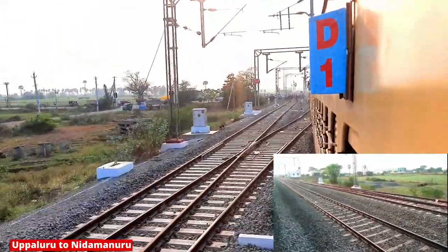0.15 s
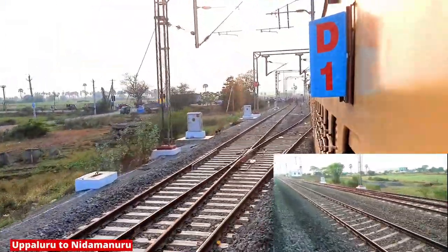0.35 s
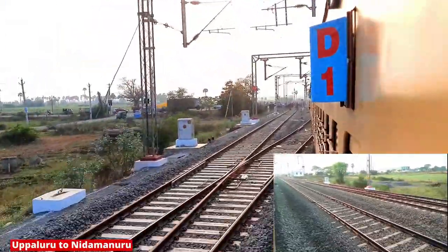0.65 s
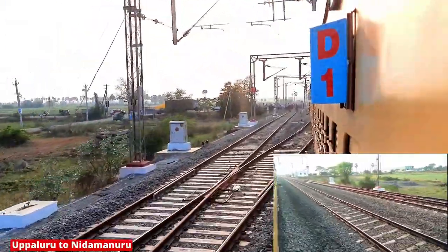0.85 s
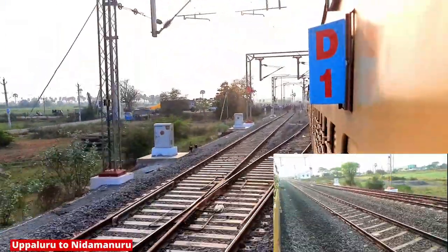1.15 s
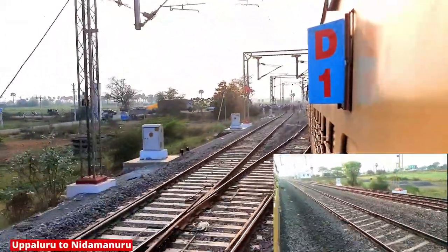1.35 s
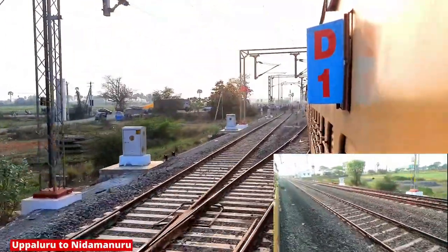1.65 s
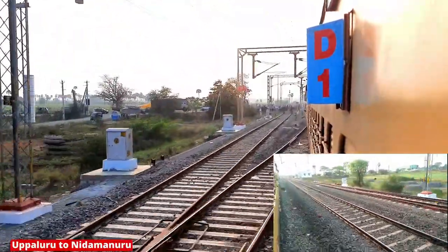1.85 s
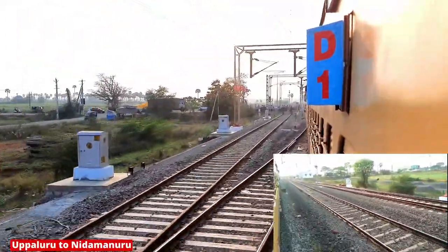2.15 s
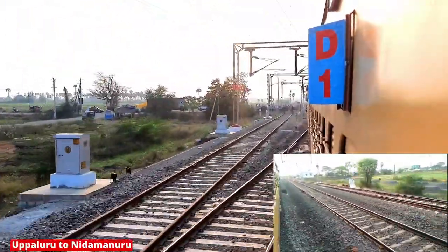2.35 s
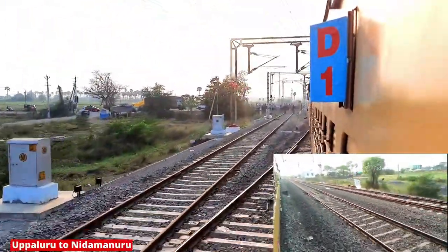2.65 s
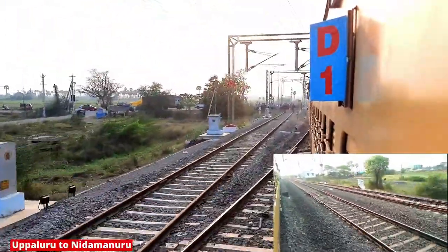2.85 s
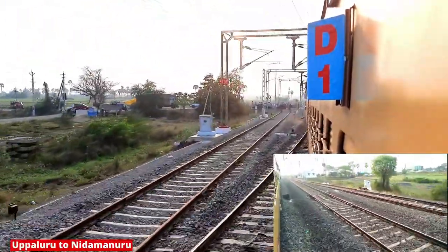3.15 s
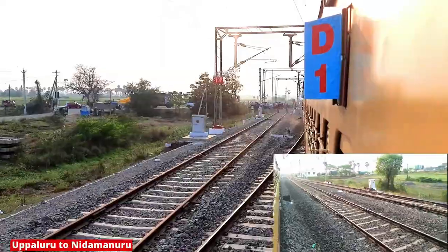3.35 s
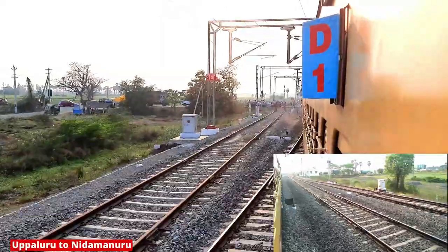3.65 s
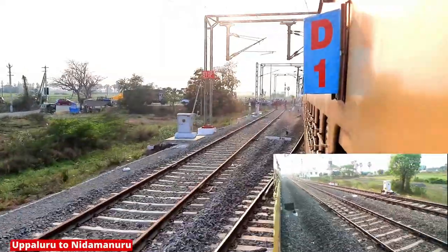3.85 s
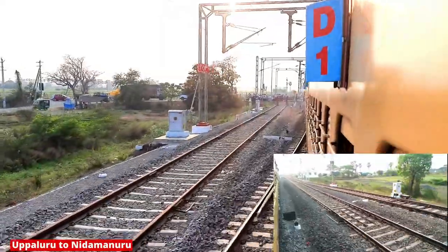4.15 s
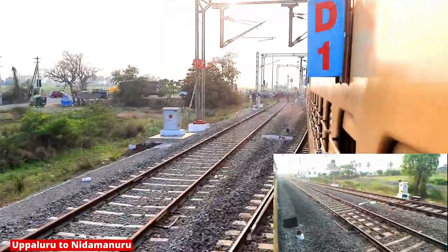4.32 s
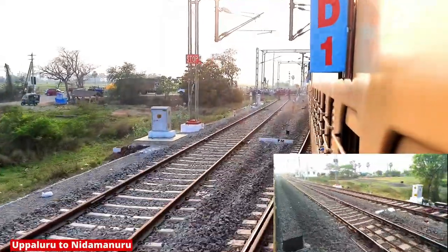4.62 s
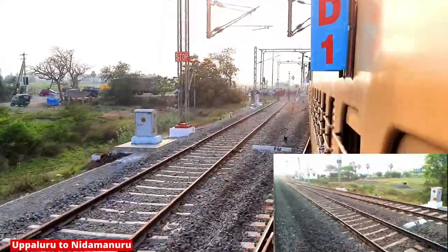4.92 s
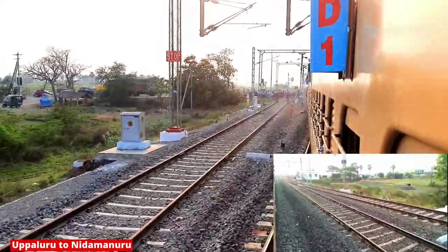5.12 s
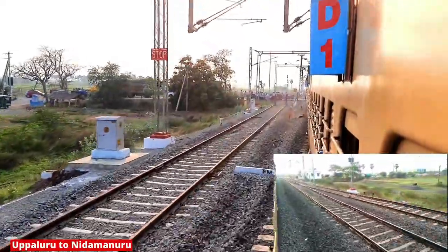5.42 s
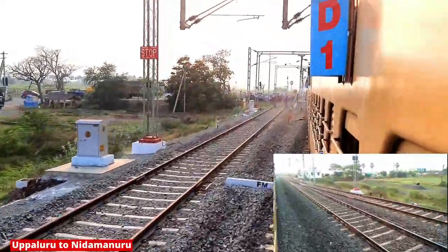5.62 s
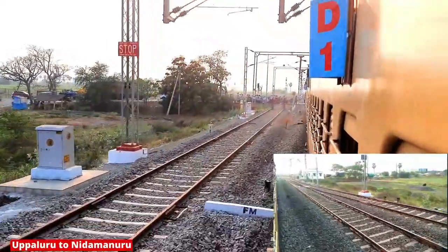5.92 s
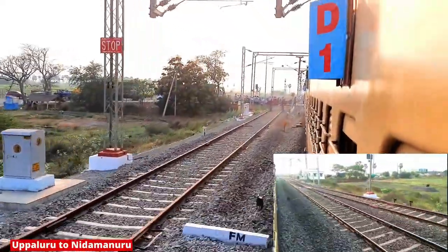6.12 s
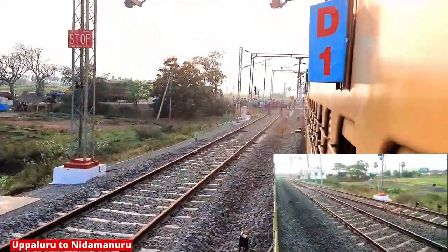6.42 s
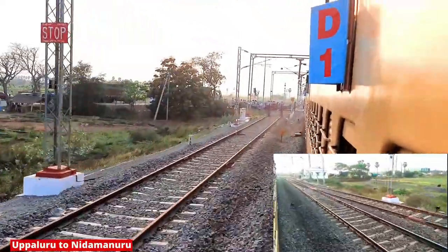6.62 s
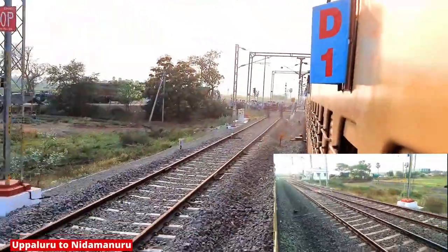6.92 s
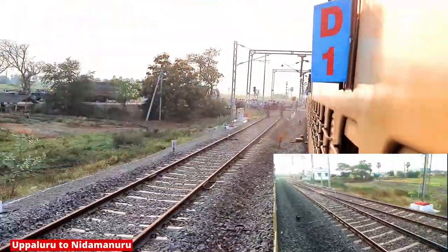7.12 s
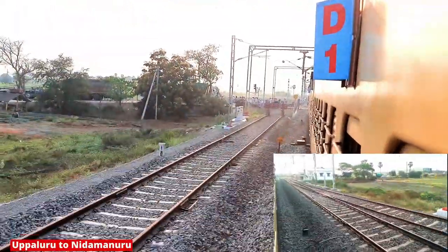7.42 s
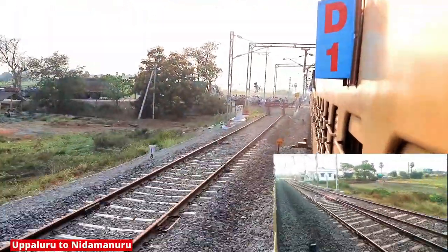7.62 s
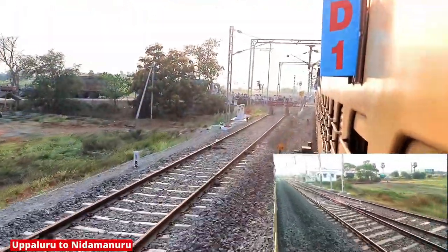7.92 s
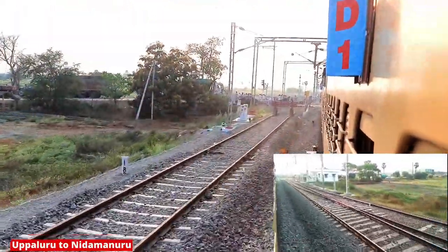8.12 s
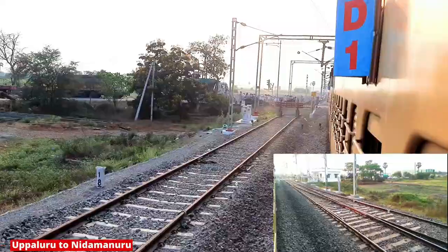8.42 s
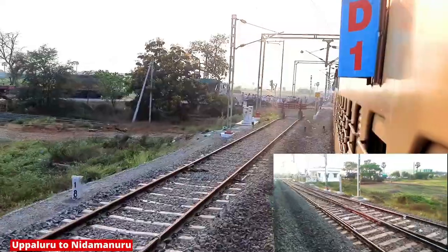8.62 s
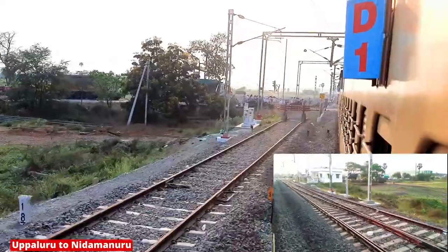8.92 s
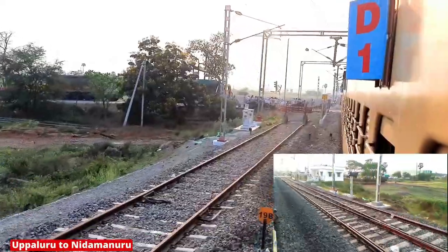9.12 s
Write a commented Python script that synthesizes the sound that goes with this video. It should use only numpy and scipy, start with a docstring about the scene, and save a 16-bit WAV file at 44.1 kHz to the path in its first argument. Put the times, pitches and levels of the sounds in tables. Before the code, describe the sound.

Riding at a train's open door: wheels roar and knock over joints, wind buffets, faint birds peep, then one loud short horn blast echoes away.

```python
"""At the open door of a passenger train: throughout, wheels and rails give shaped noise, knocks over joints and
points give decaying noise bursts, gusts buffet the microphone, and thin tones whine. Gliding squeals come first
from beside the line, then bird-like peeps, falling chirps at 4.5 s and a rough 2.8 kHz ring after the knock at
5.1 s. At 7.4 s the horn gives one short blast of summed harmonics; pitch-shifted echoes answer from the trackside
and the recorder's gain control ducks. As it recovers, a strong gust and a second run of chirps arrive."""
import sys
import numpy as np
from scipy import signal
from scipy.fft import rfft, irfft, next_fast_len
from scipy.io import wavfile
from scipy.ndimage import uniform_filter1d, minimum_filter1d, map_coordinates

SR = 44100
rng = np.random.default_rng(int(sys.argv[2]) if len(sys.argv) > 2 else 0)


def master_out(mix):
    """Clip the mix to full scale and print it as 16-bit PCM to the path in sys.argv[1]."""
    frames = np.transpose(np.atleast_2d(mix))
    ceiling = np.clip(frames, -1, 1)
    pcm = np.round(ceiling * 32767).astype(np.int16)
    wavfile.write(sys.argv[1], SR, pcm)


N = 408366
TIME = np.arange(N) / SR


def amp(db):
    """Decibels to gain."""
    return 10 ** (np.asarray(db) / 20)


def unit(x):
    """Scale to rms 1."""
    return x / np.sqrt(np.mean(x ** 2) + 1e-20)


def along(points, hz):
    """Read (Hz, value) points on a log frequency axis."""
    f, v = np.transpose(points)
    return np.interp(np.log(hz + 1), np.log(f + 1), v)


def curves(rows, t=TIME):
    """Each column after the first, read at t."""
    first, *cols = np.transpose(rows)
    return [np.interp(t, first, c) for c in cols]


def wobble(rate, size=N):
    """A smooth random curve, rate knots a second."""
    knots = rng.standard_normal(int(size * rate / SR) + 4)
    return map_coordinates(knots, [np.arange(size) * rate / SR + 1])


def filtered(x, response):
    """x times a response of frequency."""
    n = x.shape[-1]
    m = next_fast_len(n + 4096)
    spectrum = rfft(x, m) * response(np.fft.rfftfreq(m, 1 / SR))
    return irfft(spectrum, m)[..., :n]


def sides(lean_db):
    """Left and right gains for a level difference, left minus right."""
    return amp(np.array([[.5], [-.5]]) * lean_db)


def add(track, s, sound):
    """Mix a sound into the track at second s."""
    part = track[:, max(0, round(s * SR)):][:, :sound.shape[-1]]
    part += sound[..., :part.shape[-1]]


def noise(colour_db, alike, size):
    """Stereo noise of rms 1 with a given colour and left-right likeness."""
    def mid_side(hz):
        turn = np.arccos(np.clip(along(alike, hz), -1, 1)) / 2
        return amp(colour_db(hz)) * [np.cos(turn), np.sin(turn)]

    mid, side = filtered(rng.standard_normal((2, size)), mid_side)
    return unit(np.array([mid + side, mid - side]))


# How alike the two channels hear the running noise. Each row: frequency [Hz], likeness [0-1].
RUSH_ALIKE = [(60, 0.074), (380, .11), (1000, .002), (2400, 0)]
# How the running noise leans to one side. Each row: frequency [Hz], left minus right [dB].
RUSH_LEAN = [(30, 5), (60, 7), (130, 4.5), (380, -1.5), (950, -1), (2400, -.8), (15000, 0)]


def rush(spectrum, patchy_db):
    """Running noise whose bands swell and fade in random patches."""
    z = signal.stft(noise(lambda hz: along(spectrum, hz), RUSH_ALIKE, N), nperseg=512)[2]
    field = uniform_filter1d(rng.standard_normal(z.shape[1:]), size=5, axis=0)  # across frequency
    field = uniform_filter1d(field, size=10, axis=1)  # across time
    pair = signal.istft(z * amp(patchy_db * unit(field)), nperseg=512)[1][:, :N]
    return unit(filtered(pair, lambda hz: sides(along(RUSH_LEAN, hz))))


# Rolling noise drifts with the state of the track, before the bumps jolt it.
# Each row: time in seconds [s], wheel roar level [dB], rail hiss level [dB].
TRACK_STATE = [(0, -39, -48.5), (1.0, -41, -48.5), (1.4, -42, -49.5), (2.9, -41, -48.5), (3.4, -42, -49.5),
               (4.8, -39.5, -49.5), (5.9, -43, -52), (6.55, -42, -49.5), (7.3, -42.5, -52),
               (9.25, -41.5, -53)]
# Gusts on the microphone at the door. Each row: peak time in seconds [s], peak level [dB].
GUSTS = [(.01, -35), (.77, -38), (.99, -39), (1.63, -39.5), (1.8, -42), (2.0, -39.5), (2.62, -40),
         (3.8, -40.5), (4.3, -38.5), (4.68, -40), (5.17, -39), (6.13, -47), (6.48, -38), (6.72, -42),
         (7.0, -40.5), (7.2, -45.5), (7.65, -37), (8.37, -31.5), (8.62, -34.5), (9.12, -43.5)]
# Colours of the air, the wheels and the rails. Each row: frequency [Hz], relative density [dB per Hz].
BUFFET_COLOUR = [(12, -59), (20, -10.5), (92, 6.5), (115, 7), (167, -0.5), (260, -3.5), (340, -26),
                 (570, -120)]
ROAR_COLOUR = [(88, -33), (150, -23.5), (281, -4.5), (331, 0), (448, 2.5), (494, -4), (627, -5.5),
               (771, -8.5), (926, -12.5), (1060, -13.5), (2000, -21.5), (2600, -40), (4400, -120)]
HISS_COLOUR = [(530, -54), (900, -3.5), (1980, -7.5), (2160, -8.5), (2370, -7.5), (2940, -8.5),
               (3520, -11.5), (3780, -13), (4580, -16.5), (6400, -16.5), (9610, -27), (11900, -27),
               (15700, -29)]
BREEZE_DB, BREEZE_SWING_DB, BREEZE_RATE = -47, 2.5, 7  # air between gusts: level, swing, knots a second
GUST_S = 0.065  # a gust falls to 1/e this long before and after its peak


def rolling():
    """Air tumbles past the door in gusts; rough wheels roar and rails hiss, both jolted by the same bumps."""
    roar_db, hiss_db = curves(TRACK_STATE)
    bumps = wobble(24)
    breeze = amp(BREEZE_DB + BREEZE_SWING_DB * wobble(BREEZE_RATE))
    gusts = sum(amp(db) * np.exp(-((TIME - s) / GUST_S) ** 2) for s, db in GUSTS)
    eddies_db = 1.5 * np.array([wobble(22), wobble(22)])  # separate in each channel
    buffet = np.hypot(breeze, gusts) * amp(eddies_db) * rush(BUFFET_COLOUR, patchy_db=2.5)
    roar = amp(roar_db + 2.12 * bumps) * rush(ROAR_COLOUR, patchy_db=2.0)
    hiss = amp(hiss_db + 0.5 * bumps) * rush(HISS_COLOUR, patchy_db=1.76)
    return buffet + roar + hiss


# Wheels and couplings knock under the door.
# Each row: time in seconds [s], thud level [dB], thud centre [Hz], clank level [dB].
KNOCKS = [(.116, -33, 526, -45), (.218, -38, 340, -54), (.448, -36.5, 366, -48), (.765, -36.5, 336, -60),
          (.97, -29.5, 266, -57), (1.493, -21, 400, -35), (1.632, -29.5, 392, -42.5),
          (1.918, -35.5, 340, -57), (2.004, -35, 335, -50), (2.586, -44, 505, -48.5),
          (2.625, -35.5, 336, -59), (3.146, -36, 447, -55), (3.499, -36.5, 416, -55),
          (3.743, -34, 334, -49), (3.837, -30, 210, -51), (4.12, -29.5, 433, -40.5),
          (4.466, -30.5, 513, -59), (4.486, -37, 453, -51), (4.511, -24.5, 400, -42),
          (4.722, -30.5, 427, -39), (4.789, -31, 336, -57), (5.099, -27.5, 610, -32),
          (5.157, -34.5, 340, -46), (6.083, -24, 410, -42), (6.241, -31.5, 332, -46.5),
          (6.42, -30.5, 440, -54), (6.469, -27.5, 347, -47), (6.668, -15.5, 394, -25),
          (6.813, -34.5, 440, -57), (7.057, -23.5, 408, -31.5), (7.275, -38, 395, -50.5),
          (8.548, -31.5, 254, -58), (9.044, -41, 370, -59), (9.16, -42, 535, -55)]
# The harder the clank, the shorter the thud. Each row: clank level [dB], thud's 60 dB decay time [s].
THUD_DECAY = [(-52, 0.19), (-45.5, .11), (-24, 0.052)]
# Colour of struck steel, before each part's own tilt. Each row: frequency [Hz], relative density [dB per Hz].
STEEL_COLOUR = [(350, -38), (600, 9), (900, -10), (1060, -6.5), (2020, -11), (2940, -23), (3270, -19),
                (3750, -26), (6340, -31), (8990, -44), (15000, -65)]
EDGE_DB, EDGE_DB_PER_OCTAVE = -5, 10  # bright edge relative to the clank; higher-pitched blows are brighter
KNOCK_LEAN_DB = -1.8  # left minus right


def knocks(clank_t60=.11, rattle_db=-20, rattle_t60=0.23, focus_db=13):
    """Each blow builds as the parts meet, thuds in the coach body, clanks in the steel and rattles out."""
    lead = .025  # seconds of onset kept ahead of the blow
    out, t = np.zeros((2, N)), np.arange(SR // 3) / SR - lead
    age = np.maximum(t, 0)

    def fade(t60):
        return amp(-60 * age / max(t60, .02)) + amp(rattle_db - 60 * age / rattle_t60)

    def peak_at(db, x):
        power = uniform_filter1d(np.mean(x ** 2, axis=0), size=384)
        return amp(db) * x / np.sqrt(power.max())

    def steel(slope_db):
        colour = lambda hz: along(STEEL_COLOUR, hz) + along(slope_db, hz)
        return noise(colour, [(1000, 0.15), (6000, 0.12)], len(t))

    for s, thud_db, centre_hz, clank_db in KNOCKS:
        rise = np.interp(thud_db, [-37, -25, -15], [.008, .005, .002])  # hard blows set in faster
        swell = 1 + np.tanh(t / rise)
        thud_t60, = curves(THUD_DECAY, clank_db)
        edge_db = clank_db + EDGE_DB + EDGE_DB_PER_OCTAVE * np.log2(centre_hz / 400)
        body = lambda hz: -focus_db * np.log2((hz + 1) / centre_hz) ** 2
        thud = peak_at(thud_db, noise(body, [(400, .74)], len(t)) * swell * fade(thud_t60))
        clank_noise = steel([(500, -17.0), (1000, 7.5), (2200, 7.5), (3500, -29)])
        clank = peak_at(clank_db, clank_noise * swell * fade(clank_t60))
        edge = peak_at(edge_db, steel([(1600, -24.5), (2600, -7.5)]) * swell * fade(clank_t60))
        add(out, s - lead + 0.001996, (thud + clank + edge) * sides(KNOCK_LEAN_DB))
    return out


VALVE_OPEN_S, VALVE_SHUT_S, VALVE_S = 7.385, 8.0, 0.0053  # the horn's air valve, time constant of its move
HORN_HZ, HORN_SAG_HZ_PER_S = 371.5, 3.52  # the note, sinking as the air is used
SCOOP_HZ, SCOOP_S = 16, 0.0083  # sharp by this much at opening, and the time constant of settling
SHUT_DROP_DB, SHUT_DULL_DB = 1, 9  # once shut, the horn is at once softer and duller
DRAIN_S, DRAIN_RISE_HZ = 0.085, 8.5  # the air left in the pipe runs out and the pitch lifts


def valve(t):
    """Pitch, drive and bite of the overtones as the air is let in, held and shut off."""
    since = t - VALVE_OPEN_S
    drained = np.maximum(t - VALVE_SHUT_S, 0) / DRAIN_S
    opened, shut = (1 / (1 + np.exp((s - t) / VALVE_S)) for s in (VALVE_OPEN_S, VALVE_SHUT_S))
    scoop = SCOOP_HZ * np.exp(np.minimum(-since / SCOOP_S, 1))
    pitch = HORN_HZ + scoop - HORN_SAG_HZ_PER_S * since + DRAIN_RISE_HZ * np.tanh(2 * drained)
    drive_db = 20 * np.log10(opened * np.exp(-drained ** 2) + 1e-6) - SHUT_DROP_DB * shut
    return pitch, drive_db, -SHUT_DULL_DB * shut


# The horn's lower harmonics at full drive, before the overall level.
# Each row: multiple of the note [number], relative level [dB].
HARMONICS = [(1, -5.5), (2, -11.5), (3, -15), (4, -16), (5, -20.5), (6, -22), (7, -21.5), (8, -26.5),
             (9, -29), (10, -32), (11, -33.5), (12, -36.5), (13, -34.5), (14, -37.5), (15, -37), (16, -39),
             (17, -41), (18, -39.5), (19, -42), (20, -40.5), (21, -41.5), (22, -47.5)]
# The harmonics above those. Each row: frequency [Hz], relative level [dB].
TOP_HARMONICS = [(8500, -48.5), (9600, -59), (12000, -54.5), (15700, -57.5)]
# Colour of the air escaping the horn. Each row: frequency [Hz], relative density [dB per Hz].
AIR_COLOUR = [(120, -25), (330, -7), (520, -14), (900, -26.5), (1700, -25), (2600, -33), (8000, -58)]


def horn(level_db=-1.0, brassy=.82, jitter=0.00059, flutter=0.42, air_db=-31, squeak_db=-19, squeak_hz=840):
    """A diaphragm chops air into pulses, sharper with more drive; reflections over shifting paths past the
    moving train make each harmonic flutter."""
    t = np.arange(7.3, 8.3, 1 / SR)
    n, out = len(t), np.zeros((2, N))
    pitch, drive_db, bite_db = valve(t)
    phase = 2 * np.pi * np.cumsum(pitch * (1 + jitter * wobble(120, n))) / SR
    tone = np.zeros((2, n))
    for k in range(1, 43):
        db = HARMONICS[k - 1][1] if k <= len(HARMONICS) else along(TOP_HARMONICS, k * HORN_HZ)
        scatter = lambda: wobble(30 + 2.5 * k, n) + 1j * wobble(30 + 2.5 * k, n)
        depth = .07 if k == 1 else flutter
        # one scatter shared by both channels, plus one of each channel's own
        paths = 1 + depth * (scatter() + np.array([scatter(), scatter()]))
        paths = paths / np.sqrt(1 + 2 * depth ** 2)
        # the two ports hear the overtones out of step, and the coach side smears the pulses
        spread = .25 if k == 1 else 1.2 if k < 4 else 1.6  # radians between channels
        shift = np.array([[.5], [-.5]]) * spread + (k > 4) * rng.uniform(-np.pi, np.pi)
        strength = amp(db + (k > 1) * bite_db + drive_db * (1 + brassy * np.log(k)))
        tone += strength * np.real(paths * np.exp(1j * (k * phase + shift)))
    # the blast throbs slightly
    throb = amp(1.2 * np.cos(2 * np.pi * 13.7 * (t - VALVE_OPEN_S) + .6 * wobble(5, n)))
    air = amp(air_db + drive_db) * noise(lambda hz: along(AIR_COLOUR, hz), [(400, 0.93)], n)
    # the bore squeaks just before the diaphragm locks on
    squeak_swell = np.exp(-((t - VALVE_OPEN_S + VALVE_S) / 0.013) ** 2)
    squeak = amp(squeak_db) * squeak_swell * np.sin(2 * np.pi * squeak_hz * t)
    add(out, t[0], amp(level_db) * (throb * tone + air + squeak))
    return filtered(out, lambda hz: sides(along([(370, -1.0), (1100, -1.5), (8000, -1.3)], hz)))


def reflections(blast, delays, levels_db, shifts, colour):
    """Delayed copies in each ear, each shifted in pitch by the train's motion past its reflector."""
    out, since = np.zeros((2, N)), TIME - VALVE_SHUT_S
    for channel in range(2):
        late = delays + rng.uniform(0, .0054, len(delays))  # delays as they stand when the valve shuts
        for delay, db, shift in zip(late, levels_db, rng.permutation(shifts)):
            out[channel] += amp(db) * np.interp(TIME - delay + shift * since, TIME, blast[channel])
    return filtered(out, lambda hz: amp(along(colour, hz)))


# Colours of close reflections, far echoes and the strong echo behind. Each row: frequency [Hz], gain [dB].
NEAR_COLOUR = [(370, -2), (740, 4), (1500, 0.5), (3000, 2), (7000, 4.5), (15000, 2)]
FAR_COLOUR = [(370, -2.5), (740, 10.5), (1100, 7), (1500, 1), (1850, 8), (2600, 3.5), (5000, 3.5),
              (9000, -30), (15000, -56.5)]
WALL_COLOUR = [(370, -1), (740, 9.5), (1100, 1), (2600, 4), (6000, 0), (15000, -18)]
# One strong echo from behind, flat enough to beat with the horn: least delay, pitch shift (share), level.
WALL_DELAY_S, WALL_SHIFT, WALL_DB = 0.12, -.0128, -22.5


def trackside(blast, near_db=-20, far_db=-27, fall_db=25, count=16):
    """Nearby masts answer at once, sharp ahead and flat behind; a wall, huts and trees answer later and duller."""
    near, far = np.linspace(.014, .1, count // 2), np.linspace(.12, .56, count)  # delays in seconds
    near_shifts, far_shifts = np.linspace(-.021, .022, len(near)), np.linspace(-.022, .006, count)
    masts = reflections(blast, near, near_db - fall_db * near, near_shifts, NEAR_COLOUR)
    wall = reflections(blast, np.array([WALL_DELAY_S]), [WALL_DB], [WALL_SHIFT], WALL_COLOUR)
    huts_and_trees = reflections(blast, far, far_db - fall_db * far, far_shifts, FAR_COLOUR)
    return masts + wall + huts_and_trees


def whistle(length, hz, glide, rough, overtone_db=-10):
    """One gliding note; a harsh one has an unsteady pitch and an octave overtone."""
    n = int(length * SR)
    rasp = .09 * rough * np.array([wobble(1400, n), wobble(1400, n)])
    pitch = hz * np.linspace(1, 1 + glide, n) * (1 + rasp)
    phase = 2 * np.pi * np.cumsum(pitch, axis=1) / SR
    return np.sqrt(np.hanning(n)) * (np.sin(phase) + rough * amp(overtone_db) * np.sin(2 * phase))


# Thin squeals from beside the line; the last row is a knock's ring.
# Each row: start in seconds [s], length [s], starting pitch [Hz], level [dB], roughness [0-1].
SQUEALS_AND_RING = [(.32, .36, 4300, -53, 0.6), (.49, 0.25, 7300, -54.5, .3), (.53, .18, 8600, -63, 0.3),
                    (.56, .13, 2880, -50, 0.24), (.8, .17, 4200, -57, 0.5), (.93, 0.067, 2740, -49.5, 0.2),
                    (1.17, .12, 2640, -49, 0.13), (5.087, .15, 2816, -45.5, 0.75)]
SQUEAL_GLIDE = -0.022  # share by which the pitch of a squeal or the ring moves


def squeals_and_ring():
    """Faint drawn-out whistles, and the ring after a knock, that sink a little."""
    out = np.zeros((2, N))
    for s, length, hz, db, rough in SQUEALS_AND_RING:
        add(out, s, amp(db) * whistle(length, hz, SQUEAL_GLIDE, rough))
    return out


# A bird beside the line peeps. Each row: start in seconds [s], level [dB].
PEEPS = [(1.77, -49), (2.44, -51), (2.705, -44), (2.79, -46), (2.862, -41.5), (3.376, -52), (3.588, -49),
         (3.693, -54), (3.805, -52)]
PEEP_HZ, PEEP_S, PEEP_ROUGH = 3560, .048, 0.24  # starting pitch, length, roughness 0-1
# Runs of harsh falling chirps. Each row: start in seconds [s], end [s], first gap between starts [s],
# first pitch [Hz], typical level [dB], roughness [0-1].
CHATTER = [(4.53, 5.03, .1, 6440, -61, 0.43), (8.395, 9.25, .097, 3120, -50, 0.67)]
NOTE_S, NOTE_GLIDE = .06, -.07  # every chirp: length, share by which its pitch moves
SLOWING_S, NOTE_SAG = .0056, 0.0099  # each gap is this much longer, each chirp lower by this share


def birds():
    """Single peeps, and runs of chirps that slow down and sink as they go."""
    out = np.zeros((2, N))
    for s, db in PEEPS:
        glide = rng.normal(0, .03)
        add(out, s, amp(db) * whistle(PEEP_S, PEEP_HZ, glide, PEEP_ROUGH))
    for s, end, gap, hz, db, rough in CHATTER:
        while s < end:
            add(out, s, amp(db + rng.normal(0, 0.99)) * whistle(NOTE_S, hz, NOTE_GLIDE, rough))
            s += gap
            gap += SLOWING_S
            hz *= 1 - NOTE_SAG
    return out


# Thin metallic ticks. Each row: start in seconds [s], starting level [dB], 60 dB decay time [s].
TICKS = [(1.5, -55, 0.18), (3.867, -42, 0.015)]


def ticks():
    """Very high ticks of loose metal: decaying bursts of bright noise."""
    out, t = np.zeros((2, N)), np.arange(SR // 5) / SR
    colour = lambda hz: along([(3000, -28), (9000, -12), (13000, -3), (16000, -20)], hz)
    for s, db, t60 in TICKS:
        add(out, s, amp(db - 60 * t / t60) * noise(colour, [(9000, .4)], len(t)))
    return out


# Thin electrical tones. Each row: frequency [Hz], typical level [dB].
WHINE_TONES = [(10191, -79.5), (10357, -83), (12102, -82)]


def whine():
    """Faint, slightly unsteady high tones."""
    out = np.zeros((2, N))
    for hz, db in WHINE_TONES:
        level = amp(db + 2.5 * wobble(3.6))
        drift = .45 * np.array([wobble(30), wobble(30)])  # radians, separate in each channel
        out += level * np.sin(2 * np.pi * hz * TIME + drift)
    return out


def scene():
    """Everything that reaches the open door."""
    blast = horn()
    train = rolling() + knocks() + ticks() + whine()
    return train + blast + trackside(blast) + squeals_and_ring() + birds()


def gain_control(x, limit_db=-14.0, hold=0.46, release_db=13):
    """Turn down whatever exceeds the limit, wait, then recover at release_db a second."""
    power = uniform_filter1d(np.mean(x ** 2, axis=0), size=2048)
    level_db = 10 * np.log10(np.abs(power) + 1e-12)
    half = int(hold * SR / 2)
    # the deepest cut within the past hold time
    cut_db = -minimum_filter1d(np.minimum(limit_db - level_db, 0), 2 * half + 1, origin=half)
    cut_db = np.maximum.accumulate(cut_db + release_db * TIME) - release_db * TIME
    return x * amp(-uniform_filter1d(cut_db, size=512))


TOP_HZ = 15800  # the recorder's band limit


def record(dry):
    """The recorder rides its gain and keeps nothing above its band limit."""
    return filtered(gain_control(dry), lambda hz: hz < TOP_HZ)


dry = scene()
out = record(dry)
master_out(out)
```